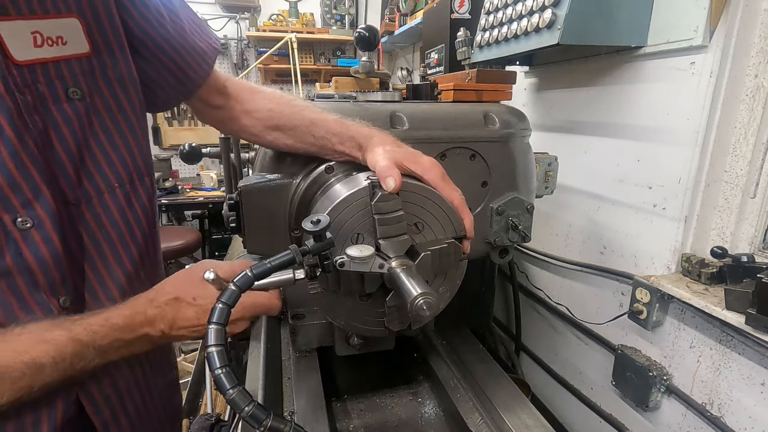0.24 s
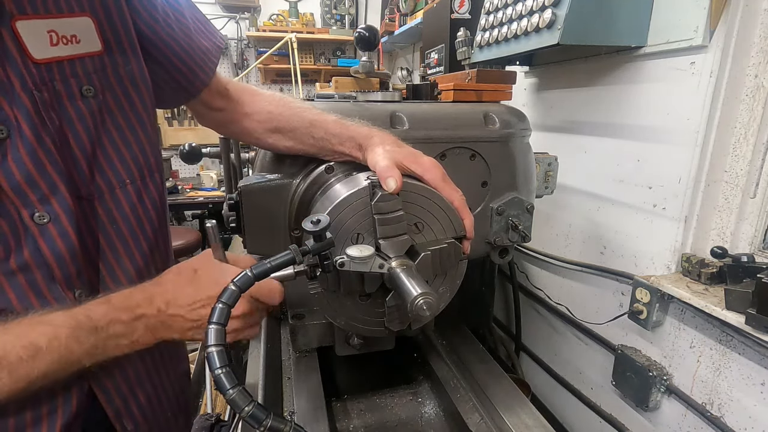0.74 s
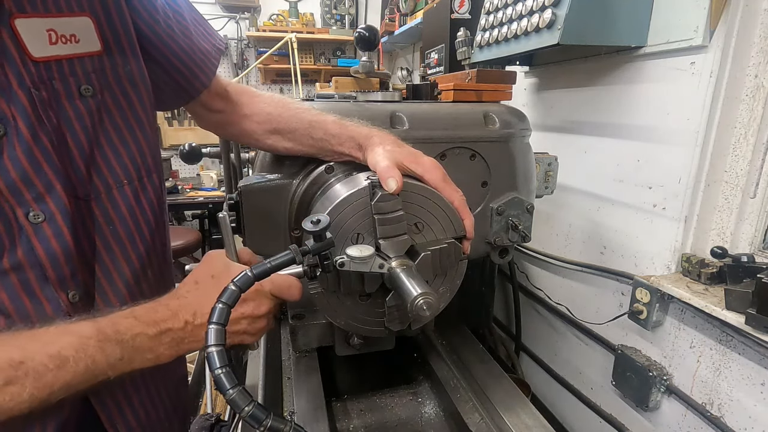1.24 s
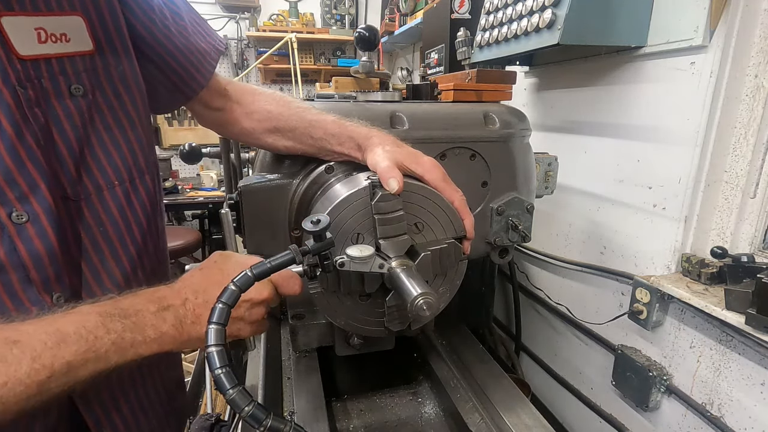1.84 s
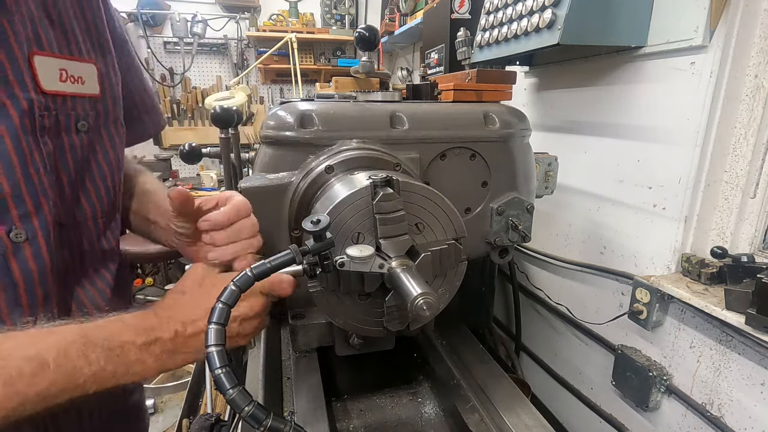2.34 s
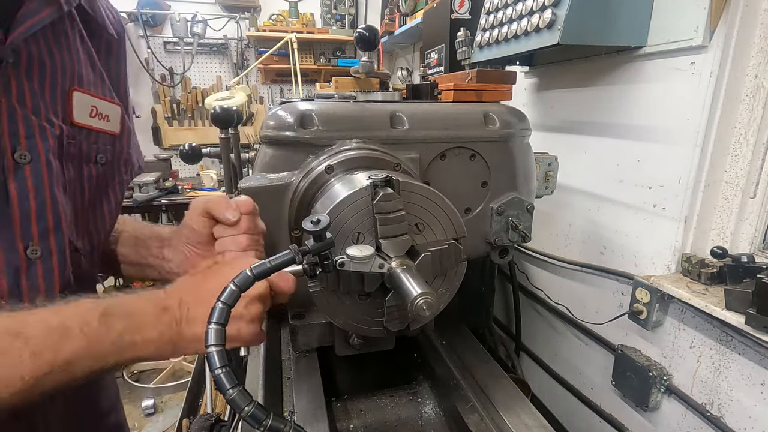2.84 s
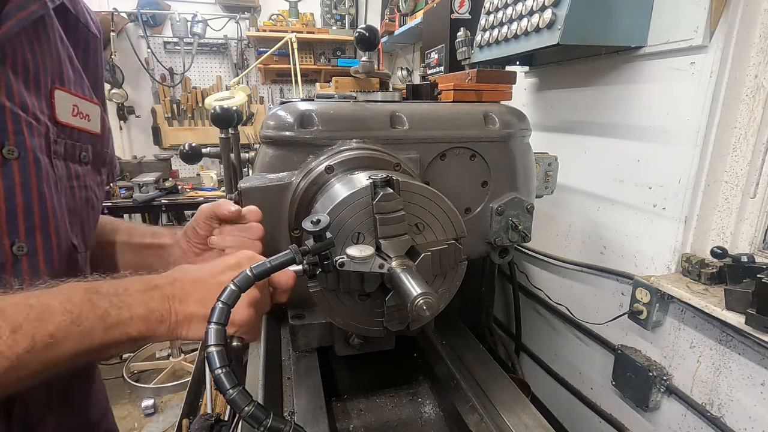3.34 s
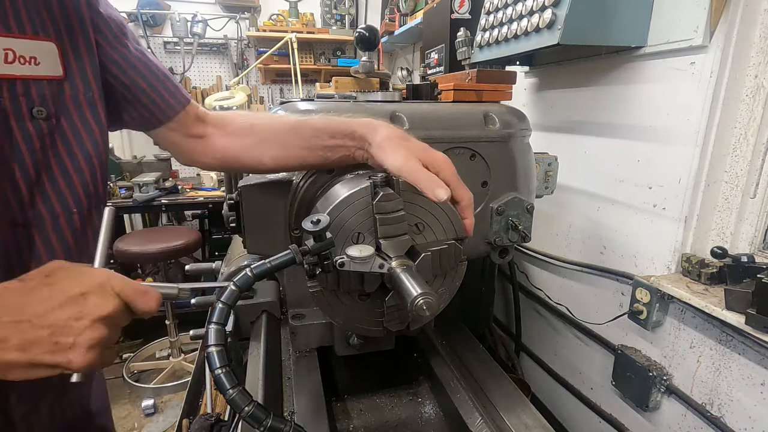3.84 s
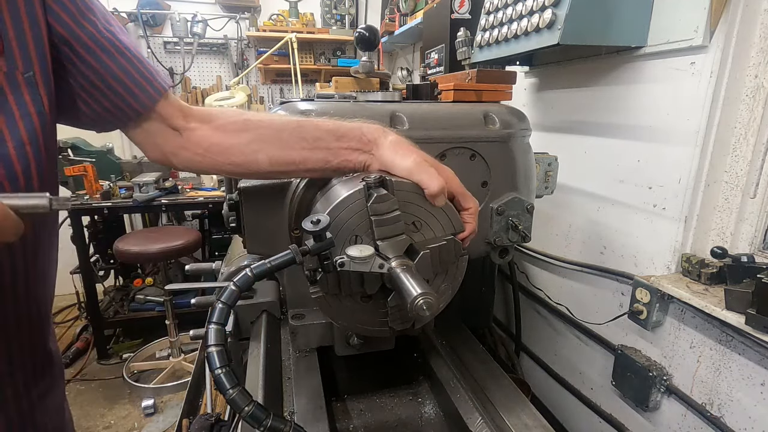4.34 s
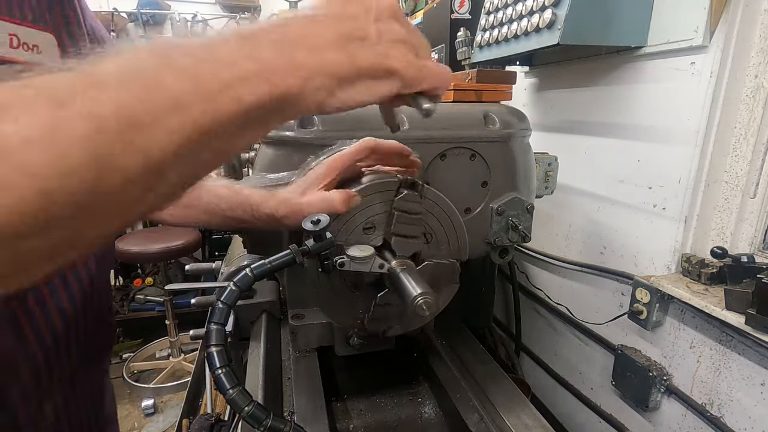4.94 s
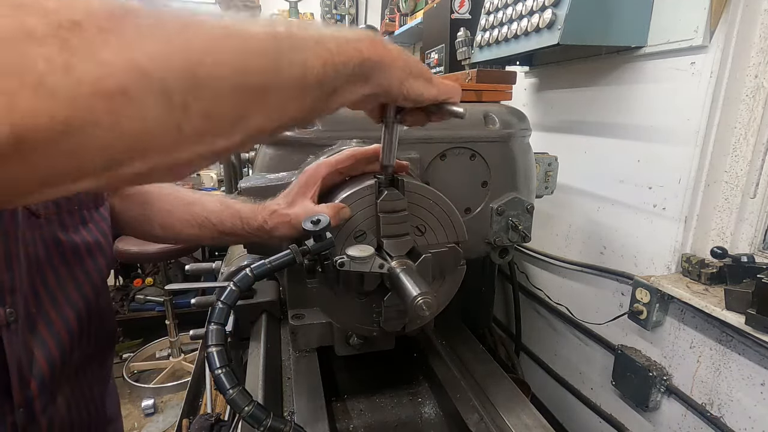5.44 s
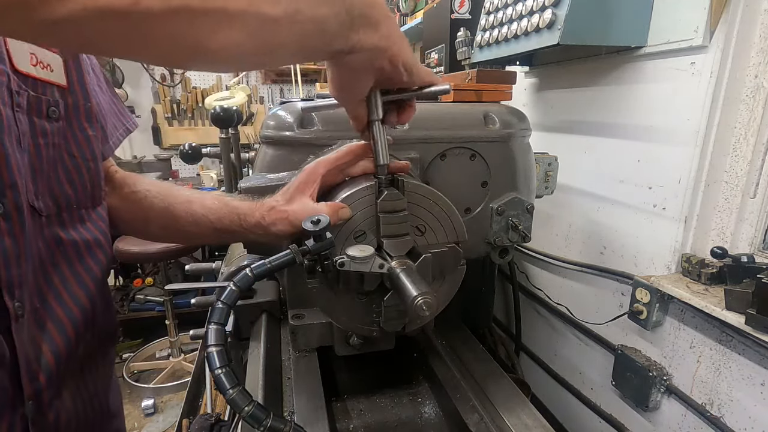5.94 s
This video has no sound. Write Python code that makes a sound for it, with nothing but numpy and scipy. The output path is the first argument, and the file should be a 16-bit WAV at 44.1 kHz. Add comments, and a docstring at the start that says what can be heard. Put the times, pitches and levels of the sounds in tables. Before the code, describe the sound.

Isolated hard clacks of levers and chuck hitting their stops come first, dry and heavy, with light loose ticks and faint spindle rumble. Then mostly soft palm and cloth rustle, and a brief low bearing rub as the chuck is turned. A chuck key scratches its socket, knocks, creaks under short pushes, and ends in a tight cluster of bright clanks. Nearby stereo pickup, short diffuse workshop reverberation, barely audible hum.

```python
"""Knocks, ticks, rubs and clanks of steel in a small workshop, with brushing hands over a faint hum.
Levers and a lathe chuck, rocked by hand, knock against their stops; the spindle is turned round.
A steel chuck key finds its socket, takes up the slack, rubs and clanks home.
Blows are pulses with chatter through resonances, rubs are runs of tiny jerks,
hands, rumble and hum are shaped noise; blows and steel rubs also excite a diffuse room."""
import sys
import numpy as np
from scipy import signal
from scipy.fft import rfft, irfft, next_fast_len
from scipy.io import wavfile

SR = 44100
rng = np.random.default_rng(int(sys.argv[2]) if len(sys.argv) > 2 else 0)


def store_wav(level_fs):
    """Save 16-bit WAV to argv[1]."""
    pcm = np.round(np.clip(np.atleast_2d(level_fs), -1, 1) * 32767)
    wavfile.write(sys.argv[1], SR, pcm.T.astype(np.int16))


N = 273276
TIME = np.arange(N) / SR

# resonances of headstock and spindle: f/Hz, width/Hz, lift/dB
LATHE_MODES = [(160, 4.3, 12), (212, 2.7, 4), (264, 33, -9.5), (341.5, 37, 10), (392.5, 51, 9.5),
               (475, 33, 12.5), (640, 18, 1.5), (1006, 99, 4.5), (1380, 110, -4.5), (1780, 260, -1.5),
               (2056, 43, 2.5), (5140, 510, 2), (8650, 89, 8.5)]
# spectrum of skin sliding on steel: f/Hz, relative density/dB
PALM_SPECTRUM = [(200, -4.5), (700, 2), (1200, 13.5), (1650, 13), (2400, 4.5), (4000, -8), (9000, -44.5)]


def from_db(db):
    """Decibels to amplitude gain."""
    return 10 ** (np.asarray(db) / 20)


def rms_one(x):
    """Scale to unit rms."""
    return x / np.sqrt(np.mean(x ** 2) + 1e-20)


def at_hz(points, hz):
    """Each column of a table, interpolated on a log-frequency axis."""
    centres, *columns = np.transpose(points)
    return np.squeeze([np.interp(np.log(hz + 1), np.log(centres), c) for c in columns])


def bins(size):
    """Frequencies of a real transform, in Hz."""
    return np.arange(size // 2 + 1) * SR / size


def lift(modes, hz):
    """Summed gain in dB of resonances; a negative lift is a dip."""
    total_db = 0
    for centre_hz, width_hz, db in modes:
        peak = from_db(abs(db)) ** 2 - 1
        power = 1 + peak / (1 + (2 * (hz - centre_hz) / width_hz) ** 2)
        total_db = total_db + np.sign(db) * 10 * np.log10(power)
    return total_db


def causal(db):
    """Minimum-phase response with this gain: nothing sounds before the blow."""
    cepstrum = irfft(np.log(from_db(db)))
    half = len(cepstrum) // 2
    cepstrum[1:half] *= 2
    cepstrum[half + 1:] = 0
    return np.exp(rfft(cepstrum))


def drift(knots_per_s):
    """Random control curve, linear between knots, rms 1."""
    knots = rng.standard_normal(N // 40)
    return rms_one(np.interp(TIME * knots_per_s, np.arange(len(knots)), knots))


def coloured(x, spectrum, modes=()):
    """Give a signal a spectrum and resonances; rms 1."""
    size = next_fast_len(N, real=True)
    hz = bins(size)
    gain = from_db(at_hz(spectrum, hz) + lift(modes, hz))
    return rms_one(irfft(rfft(x, size) * gain, size)[..., :N])


def stereo_noise(spectrum, side_db, modes=()):
    """Coloured noise, partly different in the two ears."""
    mid, side = rng.standard_normal((2, N))
    return coloured(mid + from_db(side_db) * side * [[1], [-1]], spectrum, modes)


def strokes(rows, attack_s, release_s, sag_db_per_s):
    """Envelope of rubbing movements: each rises, sags (negative: swells) while held, and dies away."""
    power = np.zeros(N)
    for start_s, length_s, db in rows:
        t = np.maximum(TIME - start_s, 0)
        rise = np.minimum(t / attack_s, 1)
        held = from_db(db - sag_db_per_s * np.minimum(t, length_s))
        fall = np.exp(-np.minimum(np.maximum(t - length_s, 0) / release_s, 20))
        power += (rise * held * fall) ** 2
    return np.sqrt(power)


def friction(envelope, spectrum, slips_per_s, modes=()):
    """A sliding contact moves in a dense random run of tiny jerks of either sign."""
    happens = rng.random(N) < slips_per_s / SR
    slips = happens * rng.choice([-1, 1], N) * rng.uniform(0.7, 1, N)
    return envelope * coloured(slips, spectrum, modes)


def chatter(rattle_ms, ring_s, ring_db, side_db, size):
    """Spectrum of what follows first contact: tiny rebounds, and a dense ring that differs from ear to ear."""
    t = TIME[:size]
    grains = rng.standard_normal(size) * rng.exponential(1, size)
    rebounds = rms_one(grains * np.exp(-1000 * t / rattle_ms))
    rebounds = rebounds * np.sqrt(rattle_ms)   # a longer rattle carries more energy
    mid, side = rng.standard_normal((2, size))
    ring = rms_one((mid + from_db(side_db) * side * [[1], [-1]]) * np.exp(-t / ring_s))
    return rfft(rebounds + from_db(ring_db) * ring) / np.sqrt(size)


def blows(table, tone, modes, own_db, direct_db, ring_db, ring_s, top_db, side_db, size=16384):
    """A sharp steel pulse and its chatter pass the resonances of struck part and body.

    Returns the direct stereo sound and the mono feed of the room."""
    # direct over reverberant energy, the casting radiates its bass all round: f/Hz, ratio/dB
    directness = [(160, -29), (430, -11.5), (1060, -0.5), (2350, 4), (4600, 2.5), (7700, 5)]
    slope_above_hz = 1890   # a soft contact takes away the treble above this
    thud_q, part_q = 2.4, 7.7   # sharpness of the heavy part's thud and the struck part's ring
    ripple_share = 0.7   # share of a blow's uneven partials that the room gets
    hz = bins(size)
    direct, spread = np.zeros((2, N + size)), np.zeros(N + size)
    bass_db = at_hz([(20, -42.5), (70, -1.5), (130, -3.5)], hz)
    body_db = at_hz(tone, hz) + lift(modes, hz) + bass_db
    octaves = np.log2(np.hypot(1, hz / slope_above_hz))
    ratio_db = at_hz(directness, hz) + direct_db
    light = 1j * hz / (700 + 1j * hz)   # only light parts chatter; the bass is one push
    fade = np.cos(np.linspace(0, np.pi / 2, size)) ** 2
    for start_s, level_db, slope, rattle_ms, own_hz, edge_hz, *thud in table:
        after = chatter(max(rattle_ms, 1), ring_s, ring_db, side_db, size)
        contact = (1 + light * after) / np.sqrt(1 + abs(light) ** 2 * np.mean(abs(after) ** 2))
        # contact time limits the treble
        edge_points = [(edge_hz, 0), (1.022 * edge_hz, top_db), (1.54 * edge_hz, 2 * top_db - 7.5)]
        edge_db = at_hz(edge_points, hz)
        part_db = lift([(own_hz, own_hz / part_q, own_db)], hz)
        if thud:   # only heavy parts have one
            thud_db, thud_hz = thud
            part_db = part_db + lift([(thud_hz, thud_hz / thud_q, thud_db)], hz)
        total_db = level_db + body_db + slope * octaves + part_db + edge_db
        room_db = total_db - 10 * np.log10(1 + from_db(ratio_db) ** 2)
        ripple_db = 10 * np.log10(np.mean(abs(contact) ** 2, axis=0))
        at = round(start_s * SR)
        direct[:, at:at + size] += fade * irfft(contact * causal(room_db + ratio_db))
        spread[at:at + size] += fade * irfft(causal(room_db + ripple_share * ripple_db))
    return direct[:, :N], spread[:N]


def background():
    """A low hum, noise booming in a few room modes, over the still air of the shop."""
    # spectra of hum and still air: f/Hz, relative density/dB
    hum_spectrum = [(25, -11), (45, -5), (70, -3), (100, -11.5), (200, -8.5), (260, -15), (600, -30),
                    (2000, -75.5)]
    air_spectrum = [(150, -32.5), (250, -3), (342, -15.5), (436, 3.5), (468, -7.5), (802, -11), (1160, -6),
                    (3460, -19), (7190, -11), (8700, -19.5), (11900, -22), (16000, -37.5)]
    # room modes: f/Hz, width/Hz, lift/dB
    hum_modes = [(58.8, 52, 1), (68, 3.1, 15), (118, 4.1, -4), (159, 4, 0), (194, 15, 4.5),
                 (218.7, 6.5, 11)]
    hum = from_db(-60.5) * stereo_noise(hum_spectrum, side_db=-13.5, modes=hum_modes)
    air = from_db(-75) * stereo_noise(air_spectrum, side_db=-4.0)
    return hum + air


def handling():
    """The spindle rumbles as it is moved; skin and cloth brush past in uneven grains."""
    # spindle rocked: start t/s, end t/s, level/dB
    rolls = [(0.0, 1.205, -65), (1.39, 1.567, -57), (1.771, 2.475, -64.5), (2.48, 2.783, -59.5),
             (2.91, 3.383, -56), (3.433, 3.852, -63), (4.004, 4.364, -71.5), (4.44, 5.181, -60),
             (5.55, 6.184, -59.5)]
    # hand and arm movements: start t/s, end t/s, palm level/dB, sleeve level/dB
    moves = [(-0.02, 0.08, -65, -64), (0.104, 0.6, -73.5, -74), (0.7, 1.254, -79, -76.5),
             (2.003, 2.124, -69.5, -67), (2.2, 2.398, -75.5, -75.5), (2.37, 2.56, -67, -63.5),
             (2.58, 2.85, -69.5, -71), (2.856, 3.28, -67.5, -71.5), (3.33, 3.581, -78, -78),
             (3.583, 3.657, -69, -66.5), (3.67, 3.84, -70, -71.5), (3.842, 3.997, -63, -63),
             (4.012, 4.334, -66, -70), (4.369, 5.24, -66, -72), (5.278, 6.19, -74.5, -83)]
    # spectra of rumble and sleeve: f/Hz, relative density/dB
    rumble_spectrum = [(30, -24), (70, -7), (110, -19.5), (150, 6), (205, -1.5), (270, -18), (450, -16.5),
                       (900, -34), (3000, -55)]
    sleeve_spectrum = [(500, -23.5), (2000, 4), (4000, 7), (6500, 7.5), (9000, -1.5), (13000, -8.5),
                       (16000, -28.5)]
    roll_rows = [(start, end - start, db) for start, end, db in rolls]
    palm_rows = [(start, end - start, db) for start, end, db, _ in moves]
    sleeve_rows = [(start, end - start, db) for start, end, _, db in moves]
    rolling = strokes(roll_rows, attack_s=0.027, release_s=0.032, sag_db_per_s=-0.9)
    sliding = strokes(palm_rows, attack_s=0.018, release_s=0.04, sag_db_per_s=5.8)
    brushing = strokes(sleeve_rows, attack_s=0.011, release_s=0.074, sag_db_per_s=-5.7)
    rumble_swell = from_db(2 * drift(8.2))
    palm_grain = from_db(2.2 * drift(45))
    sleeve_grain = from_db(0.43 * drift(140) + 0.62 * drift(24))
    rumble = rolling * rumble_swell * stereo_noise(rumble_spectrum, side_db=-2)
    palm = sliding * palm_grain * stereo_noise(PALM_SPECTRUM, side_db=-5.5)
    sleeve = brushing * sleeve_grain * stereo_noise(sleeve_spectrum, side_db=-6.0)
    return rumble + palm + sleeve


def loose_ticks():
    """Loose parts tick: light blows without a thud, through the lathe's resonances."""
    # t/s, relative level/dB, treble slope/(dB/octave), ring f/Hz
    ticks = [(0.0709, -13, -6.5, 1830), (0.7651, -7, -25, 1140), (0.8087, 3.5, -13, 1650),
             (0.9074, -13, -12, 3600), (1.1299, -21, -1, 3500), (2.0189, -16.5, -9, 2970),
             (2.3547, -28, -3, 6040), (2.5524, -16, -5.5, 3900), (2.6533, -22.5, -6, 5530),
             (3.6446, -19, -4, 1230), (3.8932, -17, -5, 4520), (4.3871, -9.5, -22, 1160),
             (4.5354, -6.5, -17, 2430), (4.749, -16.5, -11, 1500)]
    # f/Hz, level/dB
    tick_tone = [(160, -16), (430, -12), (1060, 0.5), (2350, 1), (4600, 0), (7700, 0)]
    rattle_ms, edge_hz = 7.3, 11000
    rows = [(start, db, slope, rattle_ms, hz, edge_hz) for start, db, slope, hz in ticks]
    return blows(rows, tick_tone, LATHE_MODES, own_db=10, direct_db=1.5, ring_db=-4.5,
                 ring_s=0.013, top_db=-14.5, side_db=4.0)


def lever_slides():
    """Levers slide, mostly just before they meet their stops, in sparse jerks."""
    # t/s, length/s, relative level/dB
    slides = [(.321, .014, -48), (.975, 0.021, -45.5), (1.234, 0.025, -53), (2.019, 0.062, -66),
              (2.944, .017, -55.5)]
    # f/Hz, relative density/dB
    lever_spectrum = [(300, -18), (1000, 0.5), (1600, -12.5), (2400, 10), (3000, 0), (3600, 6),
                      (4300, -14.5), (9000, -17), (15000, -51.5)]
    envelope = strokes(slides, attack_s=0.0019, release_s=0.014, sag_db_per_s=5)
    return friction(envelope, lever_spectrum, slips_per_s=370)


def stop_knocks():
    """Levers and chuck hit their stops: the struck part rings and the heavy part thuds."""
    # t/s, relative level/dB, treble slope/(dB/octave), rattle/ms, ring f/Hz, upper edge f/Hz,
    # thud lift/dB, thud f/Hz
    knocks = [(0.3357, 14.5, -1.5, 3.9, 8700, 8210, 5, 400), (0.593, -1, -5, 9.9, 2390, 8650, -2, 160),
              (0.6006, 11.5, -4, 4.2, 7200, 9000, 2.5, 443), (0.9773, 1, -16, 9.1, 2310, 11000, 23, 189),
              (0.993, -4, -8.5, 6.1, 3650, 11200, 11.5, 169.4), (0.998, 13, -9.5, 5.4, 342, 620, 8, 172),
              (1.2527, 18.5, -5.5, 6.2, 1190, 9670, 1, 313), (2.525, 6.5, -9, 10.7, 140.5, 247, 4.5, 159),
              (2.9621, 14, -4, 1.84, 5280, 7340, 16, 152)]
    # f/Hz, level/dB
    knock_tone = [(160, -8), (430, -8.5), (1060, 1.5), (2350, 3), (4600, 3), (7700, -1)]
    return blows(knocks, knock_tone, LATHE_MODES, own_db=7.0, direct_db=-2.5, ring_db=-0.5,
                 ring_s=0.0022, top_db=-11.0, side_db=-3.5)


def hand_skids():
    """The hand skids over the chuck as it swings it: skin slips in jerks."""
    # t/s, length/s, relative level/dB
    skids = [(4.384, 0.06, -56), (4.525, 0.054, -55)]
    envelope = strokes(skids, attack_s=0.0017, release_s=0.013, sag_db_per_s=31)
    return friction(envelope, PALM_SPECTRUM, slips_per_s=1900)


def spindle_swing():
    """The spindle swings round and rubs in its bearings."""
    # t/s, length/s, relative level/dB
    swings = [(4.462, 0.023, -48.5), (4.56, 0.24, -61)]
    # f/Hz, relative density/dB
    bearing_spectrum = [(100, -27), (250, 0.5), (400, 10.5), (620, 5), (900, -2.5), (1400, -18.5),
                        (1780, 2.5), (2200, -37), (3200, -39), (6000, -56)]
    envelope = strokes(swings, attack_s=0.0067, release_s=0.057, sag_db_per_s=28)
    return friction(envelope, bearing_spectrum, slips_per_s=1600)


def key_entry():
    """The key's square tip scrapes into its socket."""
    # t/s, length/s, relative level/dB
    entries = [(4.967, 0.037, -43), (5.319, 0.026, -40.5), (5.37, .06, -60)]
    # f/Hz, relative density/dB
    tip_spectrum = [(500, -28.5), (1000, -4), (1600, -4), (2400, 0.5), (3500, -0.5), (4800, -9),
                    (7500, -18.5), (12000, -34.5), (15000, -55)]
    envelope = strokes(entries, attack_s=0.0036, release_s=0.027, sag_db_per_s=35.5)
    return friction(envelope, tip_spectrum, slips_per_s=1500)


def key_clanks():
    """The key hits its socket and rings with the resonances of the key seated in the chuck."""
    # t/s, relative level/dB, treble slope/(dB/octave), rattle/ms, ring f/Hz
    key_blows = [(4.9701, -10.5, 1.5, 8.2, 3160), (5.3216, -8.5, -3.5, 8.9, 1120), (5.4384, 13, 1, 3, 2600),
                 (5.515, 4.5, -9.5, 6.7, 1220), (5.6575, 3, -14.5, 12, 1090), (6.0393, -8.5, -8, 29, 8510),
                 (6.069, -1, 7, 10, 8500), (6.0737, 7.5, 3.5, 6.1, 2290), (6.1043, 14, -3, 4.2, 1210)]
    # f/Hz, level/dB
    key_tone = [(160, -10.5), (430, 1.5), (1060, 0), (2350, 1.5), (4600, 2.5), (7700, -13)]
    # f/Hz, width/Hz, lift/dB
    key_modes = [(156, 6, 18.5), (281.3, 18, 0), (426.5, 14, 7), (630, 29, 6.5), (697, 110, 2),
                 (1080, 130, 6), (1370, 87, -5.5), (2010, 25, 9.5), (2293, 130, 2.5), (3880, 100, 0),
                 (4960, 110, 6.5), (5700, 180, 3.5), (6800, 550, -6.5), (9800, 70, -8)]
    edge_hz = 9280
    rows = [(*row, edge_hz) for row in key_blows]
    return blows(rows, key_tone, key_modes, own_db=8, direct_db=1, ring_db=0.5,
                 ring_s=0.0026, top_db=-14.5, side_db=5)


def jaw_screw():
    """Pushes on the key make the loaded jaw groan, three near 435 Hz and the others higher."""
    # pushes: t/s, length/s, relative level/dB, groan f/Hz
    turning = [(5.493, 0.058, -44, 434), (5.618, 0.051, -43.5, 437), (5.742, 0.13, -52.5, 436),
               (5.789, 0.048, -41.5, 643), (5.848, 0.063, -56, 600), (6.033, 0.092, -40, 496)]
    # f/Hz, relative density/dB
    screw_spectrum = [(100, -28), (300, -7), (450, 1.5), (640, 1), (780, -18.5), (950, -1), (1800, -15),
                      (3500, -27), (5800, -18.5), (8500, -38.5), (12000, -49)]
    # jaw under load: f/Hz, width/Hz, lift/dB
    jaw_modes = [(425, 14, 10.5), (632, 88, 7), (744, 19, 21.5), (1120, 220, -3), (8530, 200, 18.5)]
    groan_width_hz, groan_db = 26, 5
    total = np.zeros(N)
    for *push, groan_hz in turning:
        envelope = strokes([push], attack_s=0.021, release_s=0.0052, sag_db_per_s=-8)
        modes = [*jaw_modes, (groan_hz, groan_width_hz, groan_db)]
        total += friction(envelope, screw_spectrum, slips_per_s=5700, modes=modes)
    return total


def workshop(x, build_s, size=44100):
    """Diffuse reflections swell within milliseconds, slower in the bass, and die away band by band."""
    # f/Hz, reverberation time/s, reverberant energy/dB, left-right likeness/1
    room_bands = [(100, 0.66, 2, 1), (212, 0.39, 5, .82), (430, 0.49, 1, .86), (1030, 0.38, -0.5, .78),
                  (2350, 0.36, -2.5, 0.48), (4670, 0.35, -5, 0.59), (7850, 0.3, -4.5, 0.36),
                  (13700, 0.18, -7.5, 0.42)]
    t, hz, response = TIME[:size], bins(size), 0
    edges_hz = np.geomspace(40, 18000, 17)
    white = rfft(rng.standard_normal((2, size)))
    for low, high in zip(edges_hz, edges_hz[1:]):
        t60_s, level_db, alike = at_hz(room_bands, np.sqrt(low * high))
        alike = np.clip(alike, 0, 1)
        swell = 1 - np.exp(-t / (build_s * (1000 / high) ** 0.49))
        band = irfft(white * ((hz >= low) & (hz < high)), size) * swell * from_db(-60 * t / t60_s)
        mid, side = [rms_one(b) * np.sqrt(2 * (high - low) / SR / size) for b in band]
        side_gain = np.sqrt((1 - alike) / (1 + alike))
        response = response + from_db(level_db) * (mid + side_gain * side * [[1], [-1]])
    return signal.fftconvolve([x], response, axes=1)[:, :N]


def scene():
    """Lathe and key stand straight ahead; the room answers from all sides."""
    still = background()
    hands = handling()
    ticks, ticks_spread = loose_ticks()
    knocks, knocks_spread = stop_knocks()
    clanks, clanks_spread = key_clanks()
    rubs = lever_slides() + hand_skids() + spindle_swing() + key_entry() + jaw_screw()
    room = workshop(knocks_spread + ticks_spread + clanks_spread + rubs, build_s=0.007)
    return knocks + ticks + clanks + from_db(-0.5) * rubs + room + hands + still


def record(dry):
    """A steep elliptic low-pass cuts the top."""
    cutoff_hz, ripple_db, stop_db = 15900, 0.1, 80
    sos = signal.ellip(10, ripple_db, stop_db, cutoff_hz, fs=SR, output="sos")
    return signal.sosfilt(sos, dry)


dry = scene()
out = record(dry)
store_wav(out)
```